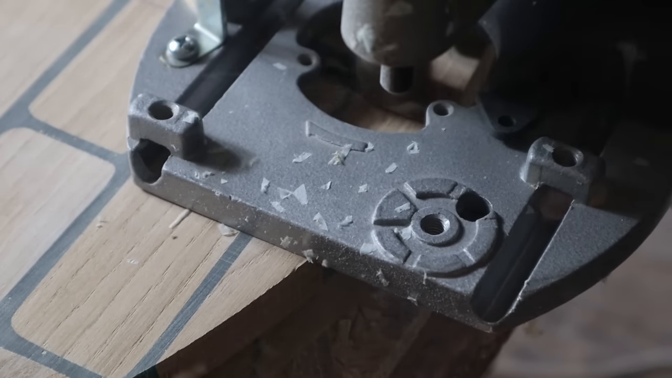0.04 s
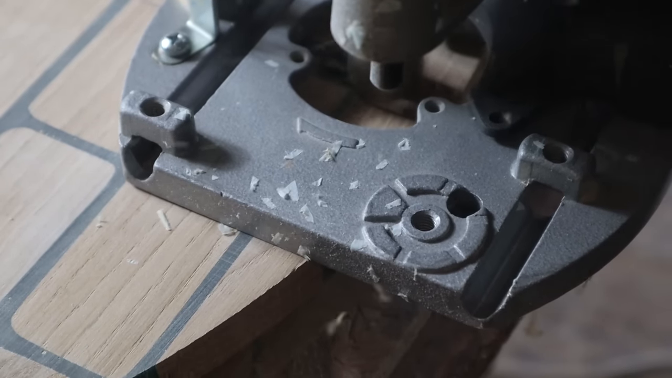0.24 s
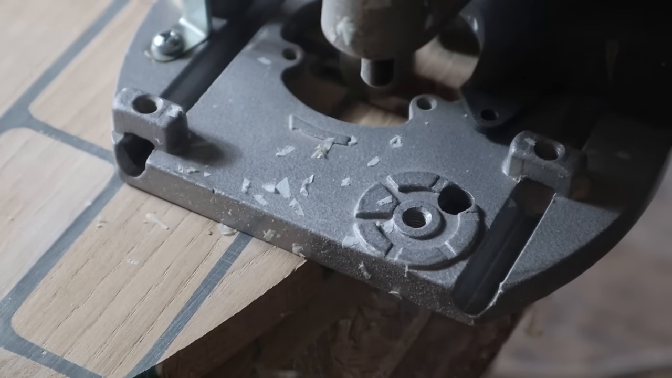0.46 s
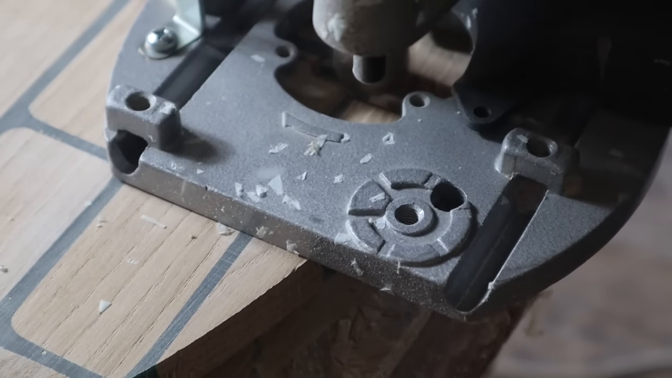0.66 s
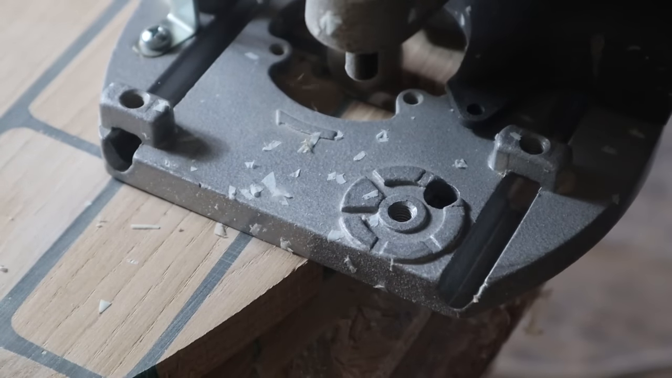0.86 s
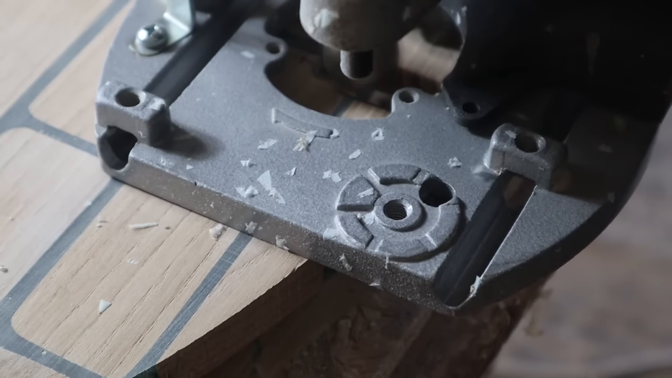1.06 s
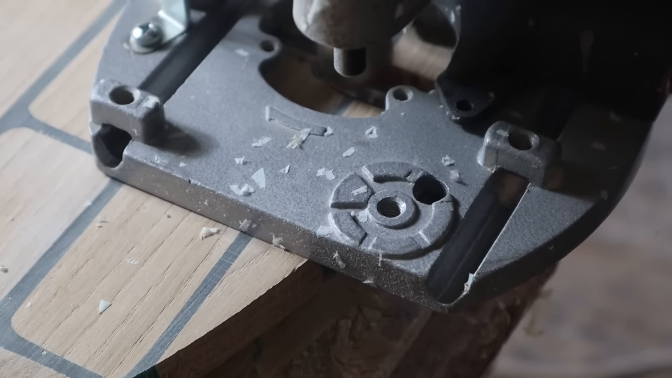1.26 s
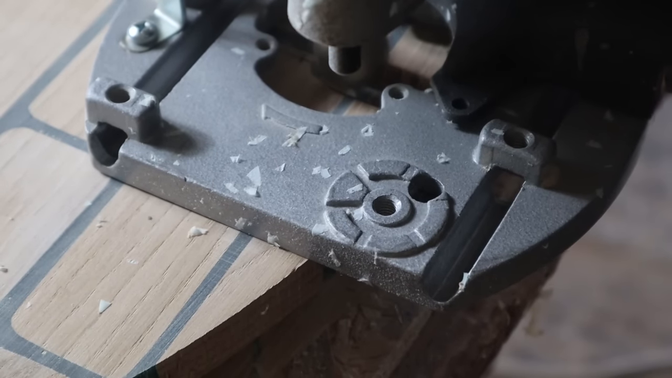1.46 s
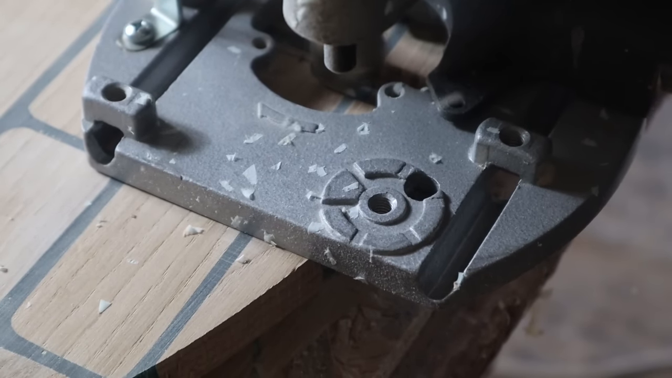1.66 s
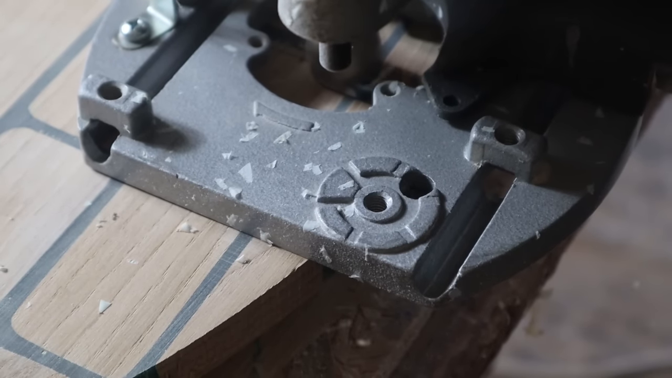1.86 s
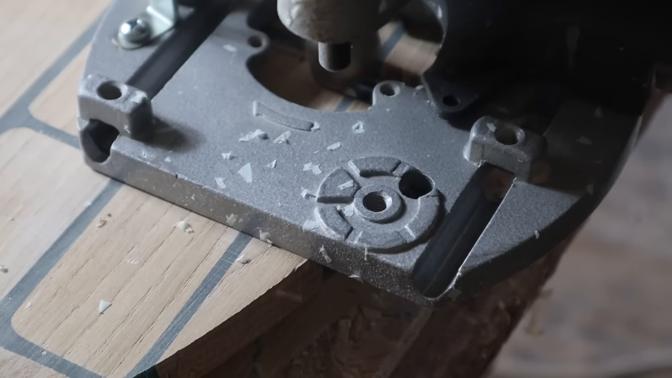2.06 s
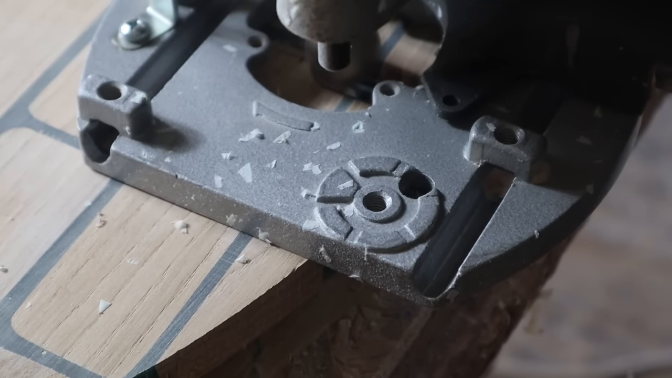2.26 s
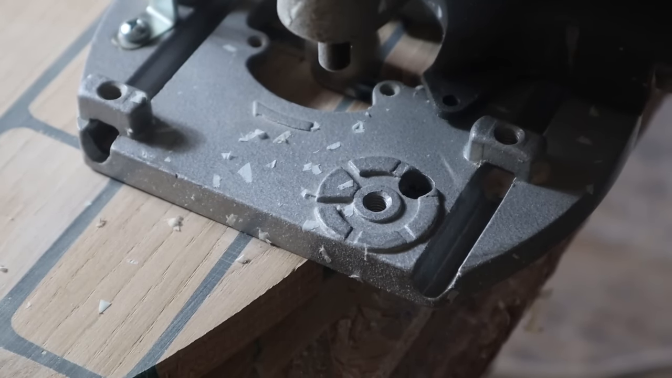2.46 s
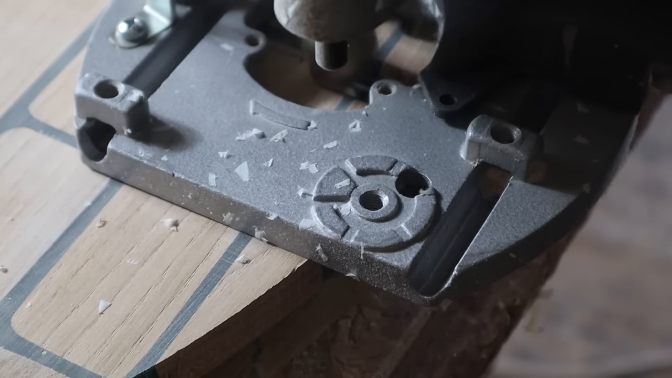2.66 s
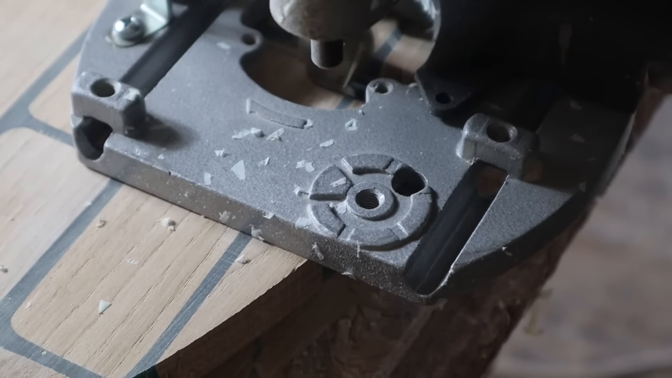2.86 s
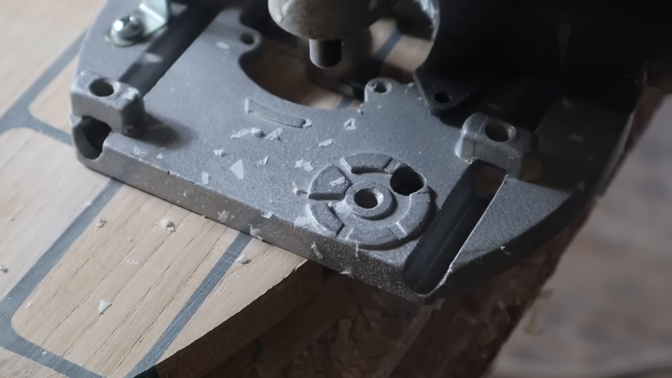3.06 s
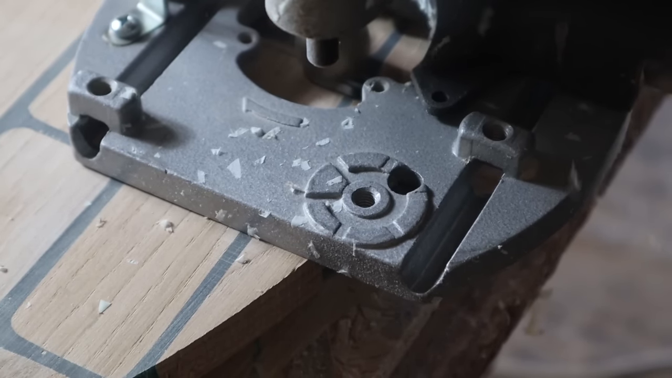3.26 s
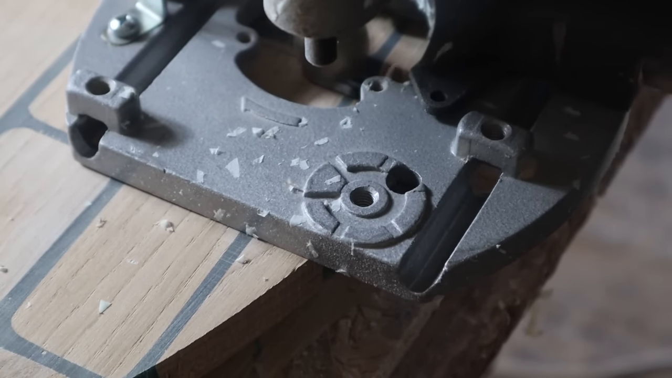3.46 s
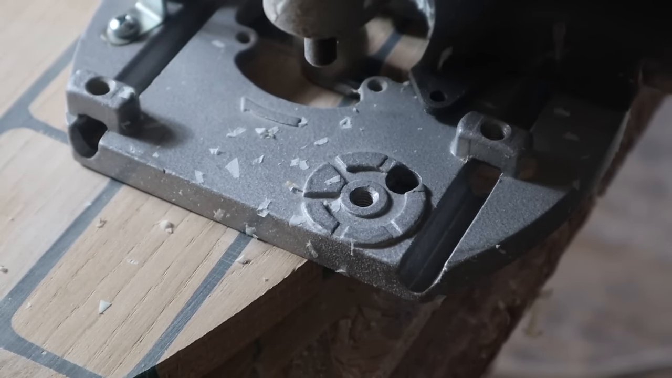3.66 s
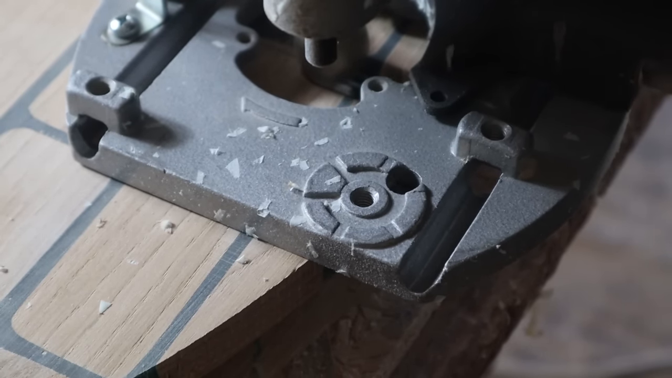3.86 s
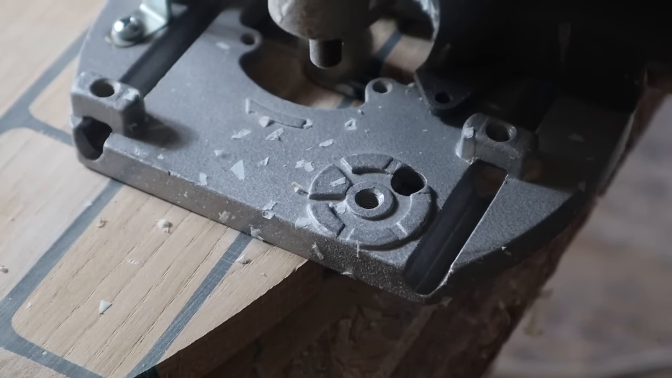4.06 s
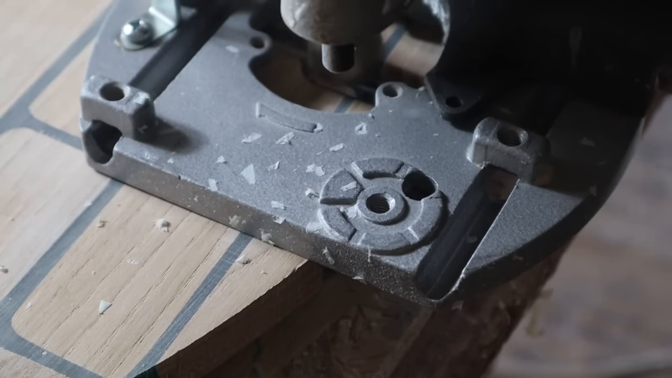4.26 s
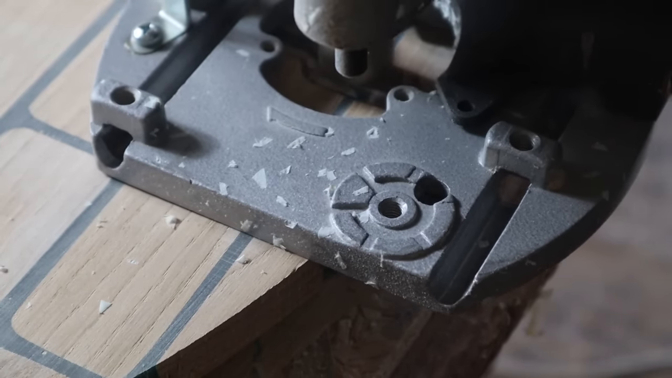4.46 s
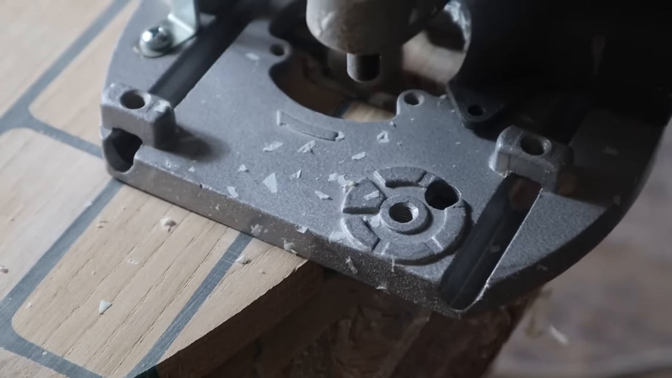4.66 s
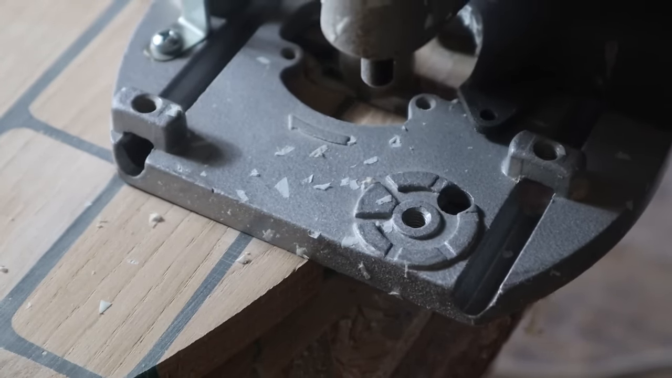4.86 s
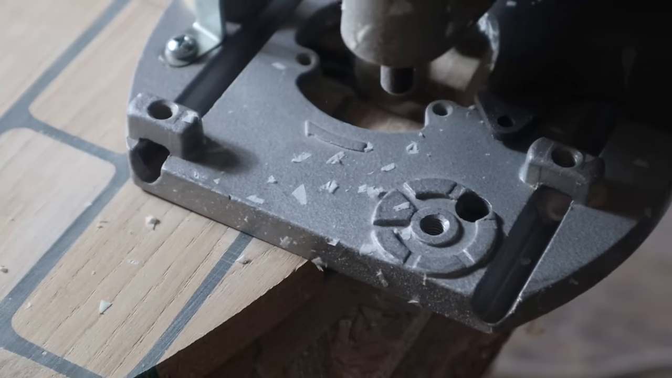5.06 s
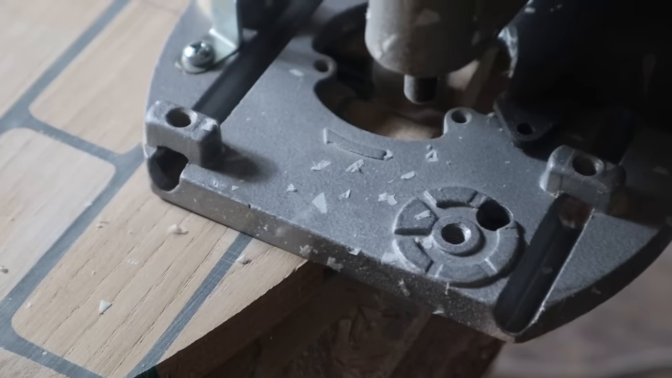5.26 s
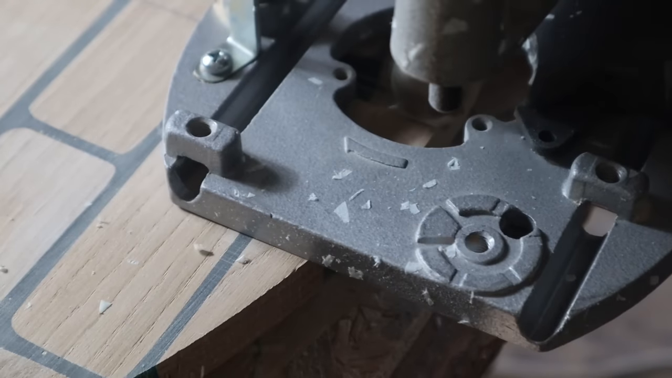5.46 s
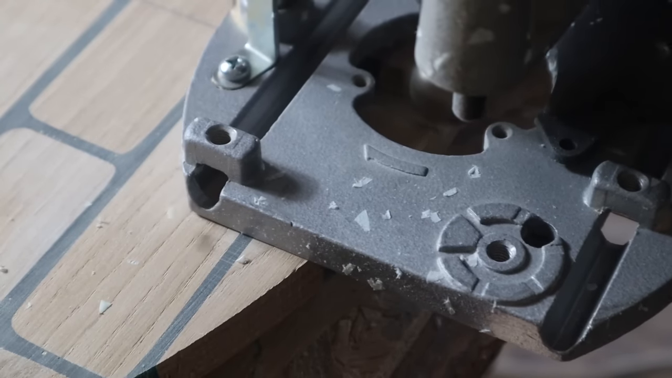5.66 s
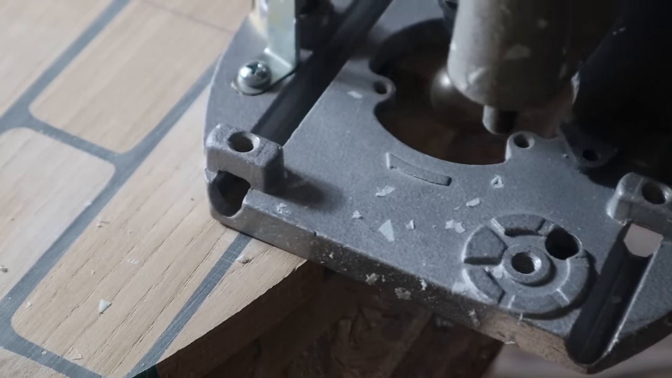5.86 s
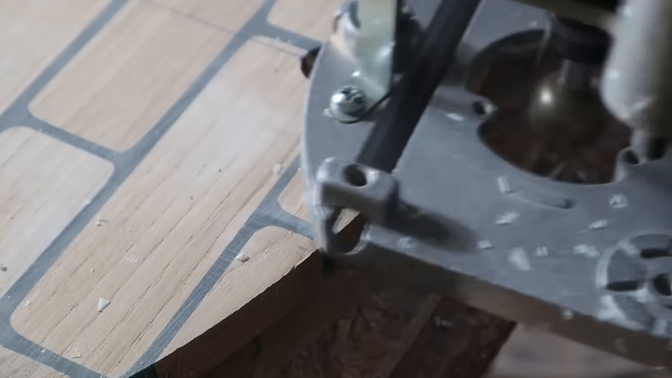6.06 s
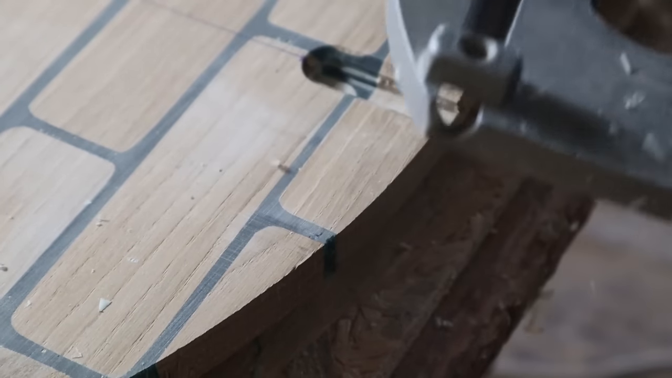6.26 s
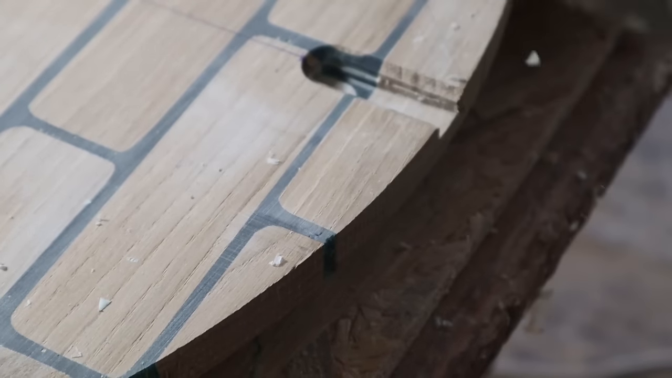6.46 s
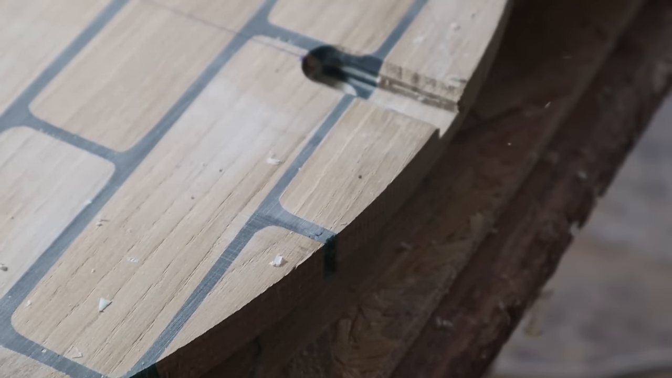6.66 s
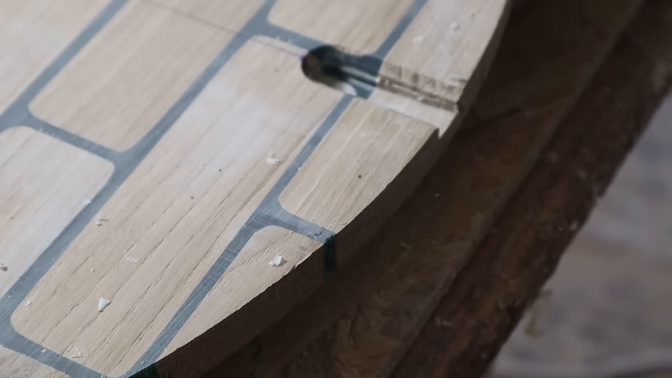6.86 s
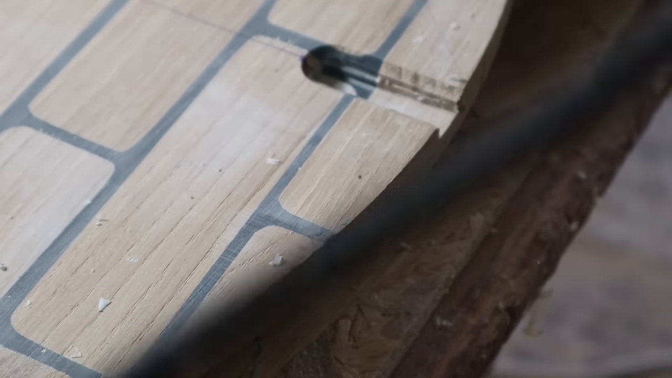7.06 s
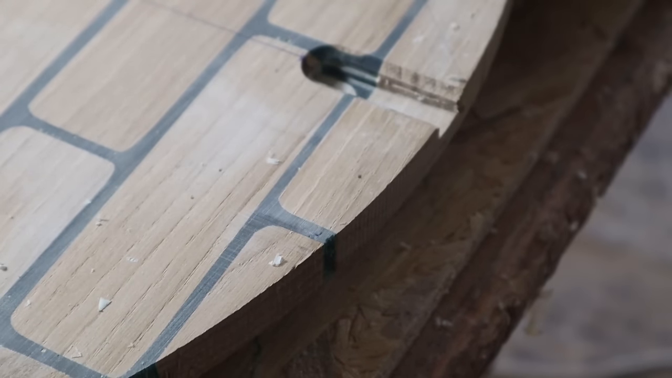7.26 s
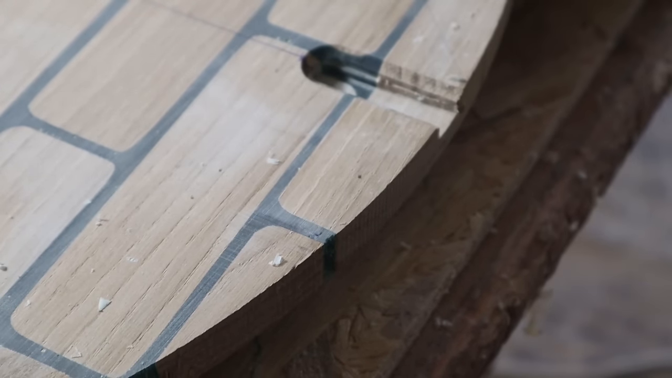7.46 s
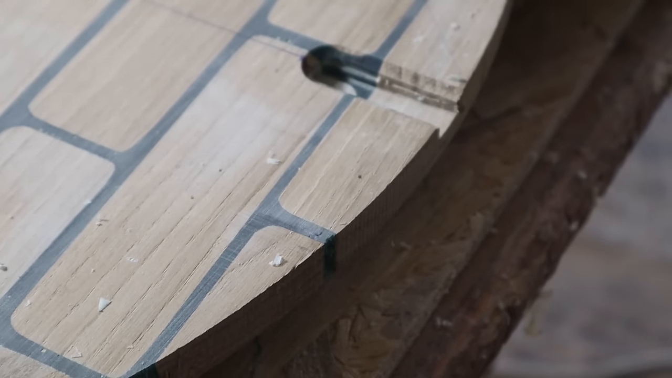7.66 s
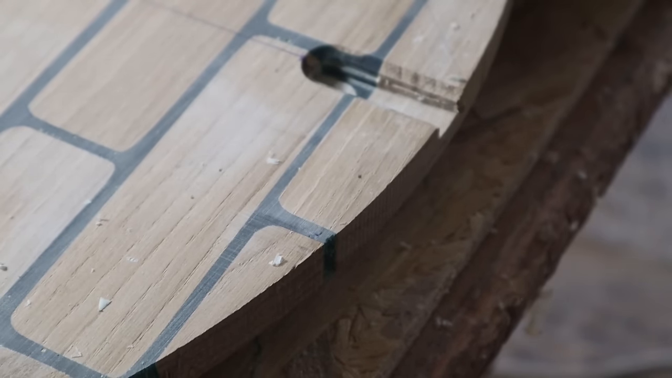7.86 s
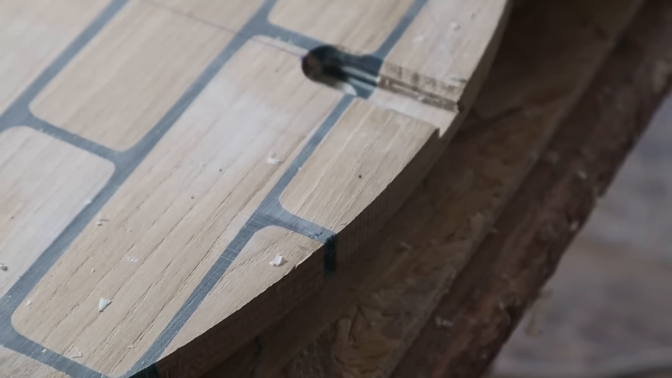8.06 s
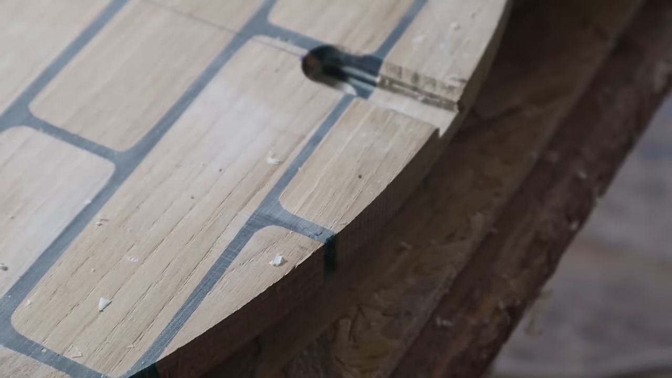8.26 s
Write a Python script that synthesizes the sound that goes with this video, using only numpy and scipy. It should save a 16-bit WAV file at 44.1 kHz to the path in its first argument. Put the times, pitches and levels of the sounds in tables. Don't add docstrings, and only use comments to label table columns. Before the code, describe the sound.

From 0 s a hand router is already cutting hardwood very close to a stereo microphone. A buzzing tone in the low five hundreds of hertz carries stacked overtones and a piercing whine near 8.5 kHz, with broad, bright cooling air hissing over it. Load bends the pitch slightly: up until about 2.7 s, dipping near 3.5 s, then rising again. Fine dust crackles almost continuously, while larger chips snap and thump irregularly left and right, the hardest around 4.6 s. At about 5.75 s the motor is switched off and leaves the wood. The tones slide steadily downward, wavering and beating with short dull echoes; only a few faint ticks remain. Air stays strong until nearly 7 s, then drops quickly as the tool is turned away. It coasts, lower and softer, towards half its original pitch, unfinished at 8.3 s over a very faint low workshop drone.

```python
import sys
import numpy as np
from scipy import signal
from scipy.fft import rfft, irfft, next_fast_len
from scipy.io import wavfile

SR = 44100
rng = np.random.default_rng(int(sys.argv[2]) if len(sys.argv) > 2 else 0)


def generate_wav(signal):
    frames = np.transpose(np.atleast_2d(signal))
    scaled = np.clip(frames, -1, 1) * 32767
    pcm = np.round(scaled).astype(np.int16)
    wavfile.write(sys.argv[1], SR, pcm)


def linear_from_db(decibels):
    return 10 ** (np.asarray(decibels, float) / 20)


N = 366905
OFF_S = 5.748


# [multiple of shaft speed, left_db, right_db, wobble_db, left_lead_rad once free]
TONES = [
    (1, -31.5, -42, 0.93, 0.046),
    (2, -36, -30, 1.0, -0.59),
    (3, -41, -38.5, 1.5, -0.78),
    (8, -37.5, -46, 1.3, 1.75),
    (16, -30, -33, 1.0, -1.46),
]
# [shaft_hz, unbalance_db, cutter_db, fan_db, whine_db]
SLOWING_TONES = [(262, -51, -58, -47, -55), (288, -52.5, -54.5, -47, -57.5), (338, -46, -54, -42.5, -48),
                 (376, -39, -45.5, -39, -41), (416, -46, -45.5, -51, -38), (471, -48.5, -51.5, -46, -31),
                 (499, -34, -38, -42, -25.5), (523, -43, -46, -43, -28.5)]
RIGHT_LAG_US = {1: 73144, 2: -10109, 3: -40, 8: 4527}
# [pitch_hz, level_db]
COMMUTATOR = [(8400, -44), (9000, -46), (10000, -39), (11000, -31), (13000, -33), (14500, -31),
              (15600, -33)]
# [multiple, on_wood_db, left_minus_right_db, free_and_near_db]
WEAK_TONES = [
    (4, -62, -27, -46),
    (5, -48, -19, -62),
    (6, -46.5, 7.5, -53),
    (12, -48, 4, -45.5),
]


def motor():
    hz, s, (loaded_hz,) = shaft_speed(), np.arange(N) / SR, in_time(SPEED)
    alike, lead_us, turn, pan_db, lifted = in_time(PLACE)
    free = np.clip((s - OFF_S) / 0.13, 0, 1)
    moving = 1 + 1.4 * free + 2.8 * np.clip(lifted, 0, .5)
    speeds, *columns = np.transpose(SLOWING_TONES)
    unbalance, cutter, fan, whine = [np.interp(hz, speeds, c) for c in columns]
    slow_levels = (unbalance, cutter, cutter - 3, fan, whine)
    out = 0
    for (order, left_db, right_db, wobble_db, free_lead), slow_db in zip(TONES, slow_levels):
        order = round(order)
        beamed = order == 16
        sides = []
        for k, db in enumerate((left_db, right_db)):
            held_db = db + reflected_db(order, k, hz)
            free_db = slow_db + (.5 - k) * (1 + 0.93 * beamed) * pan_db
            sides.append((1 - free) * held_db + free * free_db)
        if beamed:
            lead = 1 - .33 * (s - 3.1) ** 2
            free_lead = free_lead + 2.5 * lifted
        else:
            lead = np.angle(np.exp(2e-6j * np.pi * order * loaded_hz * RIGHT_LAG_US[order]))
        lead = (1 - free) * lead + free * free_lead
        out = out + tone(hz, order, *sides, lead=lead, wobble_db=wobble_db * moving)
    bars_db = at_hz(COMMUTATOR, 32 * hz)
    swing = -1.7 + 4.2 * np.clip((lifted - .3) / .45, 0, 1)
    out += tone(hz, 32, bars_db + 0.9 * pan_db, bars_db - 0.58 * pan_db, lead=swing, wobble_db=2.0)
    out += tone(hz, 48, left_db=-53, right_db=-53, lead=2.0, wobble_db=4.0)
    near_db = in_time(AIR)[0]
    for order, held_db, pan, free_db in WEAK_TONES:
        level = (1 - free) * held_db + free * (free_db + 1.8 * near_db) + 2.0 * drift(0.39)
        half_pan = (1 - free) * pan / 2
        out += tone(hz, round(order), level + half_pan, level - half_pan, lead=0.5, wobble_db=0.94 * moving)
    return out + free * (1 - 2.3 * np.clip(lifted, 0, .3)) * (walls(out) - out)


def tone(shaft_hz, order, left_db, right_db, lead, wobble_db):
    phase = 2 * np.pi * order * np.cumsum(shaft_hz) / SR + 0.053 * order ** .5 * drift(84)
    sides = []
    for db, lag in ((left_db, lead), (right_db, 0)):
        level = linear_from_db(db + wobble_db * drift(9.6))
        sides.append(level * np.sin(phase + lag + 0.17 * drift(2.1)))
    heard = order * shaft_hz < .36 * SR
    return np.sqrt(2) * np.array(sides) * heard


# [time_s, shaft_hz]
SPEED = [(0.0, 528.2), (0.5, 530.1), (1.0, 535.2), (1.25, 536.5), (2.0, 537.1), (2.5, 541.2), (2.75, 541.3),
         (3.0, 536.1), (3.5, 529.4), (3.75, 529.9), (4.25, 538.0), (4.75, 543.2), (5.25, 545.3),
         (5.748, 545.1)]


def shaft_speed():
    coast_s, drag_power = 4.7456, 1.695
    since = np.clip(np.arange(N) / SR - OFF_S, 0, None)
    return in_time(SPEED)[0] * (1 + since / coast_s) ** -drag_power


REFLECTIONS = [(1, 0, 19813, 0.55), (1, 0, 112094, 0.16), (1, 1, 72772, 0.41), (1, 1, 131539, 0.19),
               (2, 0, 9693, 0.49), (2, 0, 115576, 0.16), (2, 1, 9797, 0.78), (2, 1, 86085, 0.08),
               (3, 0, 9338, 0.7), (3, 0, 111840, 0.21), (3, 1, 19920, 0.34), (3, 1, 111827, 0.07),
               (8, 0, 2540, 0.71), (8, 0, 14590, 0.29), (8, 1, 2933, 0.31), (8, 1, 39923, 0.17),
               (16, 0, 1452, 0.51), (16, 0, 19971, 0.12), (16, 1, 6050, 0.39), (16, 1, 21534, 0.21)]


def reflected_db(order, side, hz):
    total = 1
    for k, s, path_us, share in REFLECTIONS:
        if (k, s) == (order, side):
            total = total + share * np.cos(2e-6 * np.pi * order * hz * path_us)
    return 20 * np.log10(abs(total) + .02)


# [delay_s, level_db, side (0 left, 1 right)]
ECHOES = [
    (.0730, -4.5, 0),
    (.0733, -5, 1),
]


def walls(x):
    dull = signal.sosfilt(signal.butter(2, 800, fs=SR, output="sos"), x.mean(axis=0))
    out = x.copy()
    for delay_s, db, side in ECHOES:
        delay = round(delay_s * SR)
        out[int(side > .5), delay:] += linear_from_db(db) * dull[:N - delay]
    return out


# [time_s, nearness_db, aim_db of the jet at the microphone]
AIR = [(0.05, 2.2, 0), (.6, 1.1, 1.5), (1.4, 0.66, 0), (2.0, 0.1, 1), (2.2, -0.5, 0), (3.2, -0.35, 0.2),
       (4.3, 0.2, 0), (4.8, -.4, -.5), (5.7, 0.2, -0.5), (6.05, -1, -0.5), (6.2, -1, 0.5), (6.45, -1.5, 2),
       (6.88, -1, 2), (7.1, -3.5, -2), (7.25, -7, -1.5), (7.5, -7.5, -4), (7.75, -8, -5), (8.32, -7.5, -5)]
AIR_HZ = [1100, 3400, 9000, 13500]
AIM = [0, .1, 1, 1.5]
# [pitch_hz, level_db per Hz]
RUSH = [(200, -28.5), (450, -15), (1100, -6), (2050, -5.5), (2750, -0.5), (3300, 0), (4000, -4),
        (5500, -8.5), (8000, -4), (9000, -7.5), (11000, 0), (12100, -2), (14000, -18), (15500, -14)]
# [pitch_hz, gain_db]
COAST = [(250, 1), (500, 3), (900, 4), (1800, 4), (2600, 5), (3600, -6.5), (5000, 3), (8000, -1.5),
         (11000, 9), (14000, -36)]
# [time_s, left-right likeness 0-1, right_lead_us, treble_turn_rad,
# left_minus_right_db, lifted 0-1]
PLACE = [
    (0, 0.83, 27, -0.5, -0.3, 0),
    (2.5, 0.46, 8, 0, 0.4, 0),
    (5.6, 0.51, 35, 1, 0, 0),
    (6.2, 0.63, 51.5, 0, -2.5, 0.18),
    (6.9, 0.73, 37, 1.5, -2, 0.32),
    (7.08, 0.75, 15, 2, 1, 0.61),
    (7.35, 0.68, -2, 2.5, 1.5, 0.76),
    (8.32, 0.87, 13, 4.5, 4, 1),
]


def air():
    near_db, aim_db = in_time(AIR)
    flutter = 1.8 * drift(1.4) + drift(22)
    alike, lead_us, turn, pan_db, lifted = in_time(PLACE)
    levels = near_db + np.outer(AIM, aim_db)
    levels[-1] += 16.5 * np.log2(shaft_speed() / SPEED[0][1]) - 13 * np.clip(2 * lifted - 1, 0, 1)
    direct, diffuse = np.sqrt(np.clip(alike, 0, 1)), np.sqrt(np.clip(1 - alike, 0, 1))
    white = rng.standard_normal((2, 4, N))
    white[:, 1] = signal.hilbert(white[:, 0], next_fast_len(N)).imag[:, :N]
    edges = 170 * 2 ** np.arange(0, 6.8, 1 / 3)
    out = 0
    for k, (low, high) in enumerate(zip(edges, edges[1:])):
        band = signal.butter(3, [low, high], "band", fs=SR, output="sos")
        now, quarter, left, right = signal.sosfilt(band, white[k % 2])
        hz = np.sqrt(low * high)
        part = np.interp(np.log(hz), np.log(AIR_HZ), range(4))
        share = np.clip(1 - abs(part - np.arange(4)), 0, 1)
        jet = np.clip(np.log2(hz / 5000), 0, 1)
        lead = right_lead(hz, lead_us, turn) + 0.82 * (1 - lifted) * drift(1.3)
        turned = now * np.cos(lead) - quarter * np.sin(lead)
        pair = direct * np.array([now, turned]) + diffuse * np.array([left, right])
        level_db = share @ levels + lifted * at_hz(COAST, hz)
        waver_db = 0.27 * jet * flutter + (-0.44 + 0.24 * jet) * drift(24)
        out = out + pair * linear_from_db(level_db + waver_db)
    return linear_from_db(-23.0 + pan_db * [[.5], [-.5]]) * rms_one(coloured(out, RUSH))


def right_lead(hz, lead_us, turn):
    return 2e-6 * np.pi * hz * lead_us - turn * np.clip(np.log2(hz / 600) / 3.5, 0, 1)


# [time_s, level_db, capsule (1 left, -1 right)]
CHIPS = [(0.172, -18, -1), (0.376, -17.5, -1), (0.4887, -22, 1), (0.9321, -16, 1), (1.1018, -20, -1),
         (1.374, -20.5, 1), (1.5696, -18.5, 1), (1.825, -21, -1), (1.902, -18, 1), (1.961, -16, -1),
         (1.9902, -13.5, 1), (2.1158, -18, 1), (2.5021, -13.5, 1), (3.014, -17.5, 1),
         (3.1864, -20.5, 1), (3.396, -20, 1), (4.0026, -20, 1), (4.0208, -15, -1), (4.1683, -16.5, 1),
         (4.3714, -17.5, 1), (4.4202, -18, -1), (4.5083, -18, 1), (4.6242, -9, -1), (5.0554, -17, 1),
         (5.1824, -18.5, -1), (5.617, -21, 1), (5.7162, -21, 1), (6.574, -28, 1), (6.921, -30, 1),
         (7.207, -29, 1),
         (0.5377, -20, 1), (0.573, -23, -1), (0.7825, -25, 1), (0.791, -24, -1), (0.9217, -22, 1),
                  (1.0326, -21, -1), (1.218, -24, -1), (1.2876, -21, -1), (1.5413, -23, -1),
                  (1.6578, -23.5, -1), (1.7064, -21, -1), (1.798, -24, -1), (2.02, -21, -1),
                  (2.3249, -20, 1), (2.3627, -27, 1), (2.5473, -23, 1), (2.5775, -20, 1), (2.6453, -20, 1),
                  (2.9302, -18.5, -1), (3.032, -22, 1), (3.34, -22, -1), (3.8964, -22.5, 1),
                  (3.9255, -17, 1), (4.076, -21, 1), (4.1047, -22, 1), (4.1164, -24, 1), (4.2886, -21, -1),
                  (4.394, -21, -1), (5.2907, -25, 1), (5.5926, -22, -1)]
# [start_s, end_s, hits_per_s, level_db]
DUST = [
    (0, .29, 170, -37),
    (.37, 5.76, 185, -31),
    (5.76, 6.17, 90, -36),
    (6.42, 6.62, 60, -35),
    (7.15, 7.32, 40, -39.5),
]
# [start_s, end_s, hits_per_s, level_db]
SPLINTERS = [
    (.1, 2.3, 10, -26),
    (2.3, 4.6, 6, -28),
    (5.0, 5.5, 12, -31),
    (5.61, 5.76, 20, -26.5),
]


def chips():
    ms = np.arange(-40, 900) / SR * 1000

    def swing(tau_ms):
        rise = np.clip(ms + 0.38, 0, None) / tau_ms
        return rise * np.exp(1 - np.clip(ms + 0.21, 0, None) / tau_ms)

    near = 2.9 * np.exp(-(ms / 0.23) ** 2) - 1.52 * swing(1.01) + 0.62 * swing(1.45)
    far = -.85 * swing(0.42) + 0.14 * swing(2.1)
    small = shower(DUST, spread_db=3.5) + shower(SPLINTERS, spread_db=3.8)
    left = rng.random(N) < .5
    hits = np.array([small * left, small * ~left])
    for s, db, capsule in CHIPS:
        hits[int(capsule < 0), round(s * SR)] += linear_from_db(db - 0.2)
    both = signal.fftconvolve(hits, [near]) + signal.fftconvolve(hits[::-1], [far])
    return both[:, 40:N + 40]


def shower(spans, spread_db):
    s, luck = np.arange(N) / SR, rng.random(N)
    size_db, out = spread_db * rng.standard_normal(N), np.zeros(N)
    for start, end, per_s, db in spans:
        out += (s > start) * (s < end) * (luck < per_s / SR) * linear_from_db(db + size_db)
    return out


# [pitch_hz, level_db per Hz]
SHOP = [(25, -20), (60, -12), (80, 0), (108, 2.5), (140, -1), (250, -7), (500, -32)]


def shop():
    return linear_from_db(-61.5 + 4.3 * drift(5.5)) * rms_one(coloured(rng.standard_normal(N), SHOP))


def coloured(x, spectrum):
    size = next_fast_len(N)
    gain = linear_from_db(at_hz(spectrum, np.fft.rfftfreq(size, 1 / SR) + 1))
    return irfft(rfft(x, size) * gain, size)[..., :N]


def rms_one(x):
    return x / np.sqrt(np.mean(x ** 2) + 1e-20)


def in_time(rows):
    s, *columns = np.transpose(rows)
    return [np.interp(np.arange(N) / SR, s, c) for c in columns]


def at_hz(points, hz):
    points_hz, db = np.transpose(points)
    return np.interp(np.log(hz), np.log(points_hz), db)


def drift(rate_hz):
    r = np.exp(-80 * np.pi * rate_hz / SR)
    slow = signal.lfilter([1], [1, -2 * r, r * r], rng.standard_normal(N // 40 + 2002))[2000:]
    return np.interp(np.arange(N) / 40, np.arange(len(slow)), rms_one(slow))


def scene():
    return motor() + air() + chips() + shop()


def top_cut(x):
    return signal.sosfilt(signal.butter(12, 15590, fs=SR, output="sos"), x)


def record(dry):
    mid = signal.sosfilt(signal.butter(2, 40, "high", fs=SR, output="sos"), dry[0] + dry[1]) / 2
    side = signal.sosfilt(signal.butter(2, 70, "high", fs=SR, output="sos"), dry[0] - dry[1]) / 2
    return top_cut(np.array([mid + side, mid - side]))


dry = scene()
out = record(dry)
generate_wav(out)
```